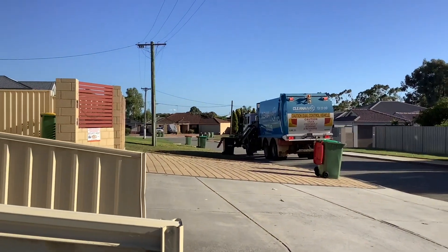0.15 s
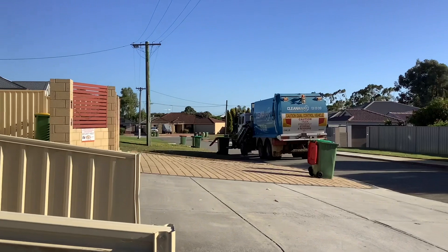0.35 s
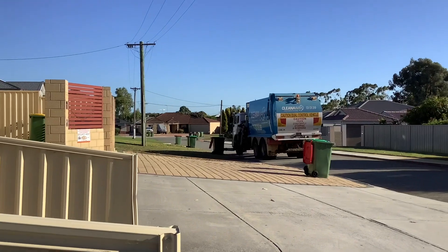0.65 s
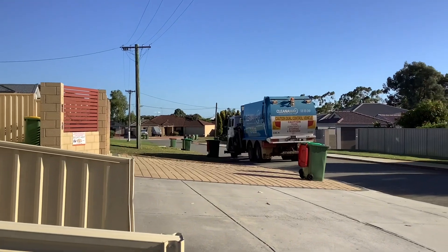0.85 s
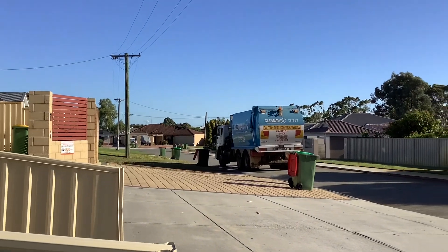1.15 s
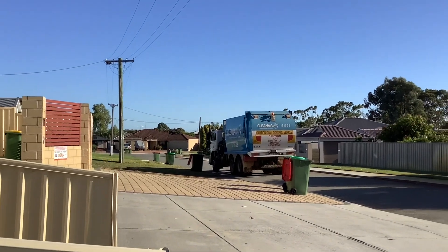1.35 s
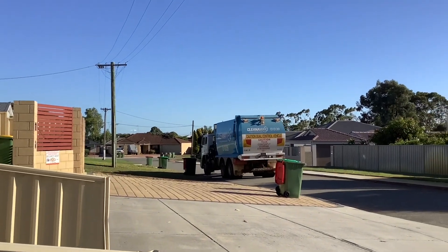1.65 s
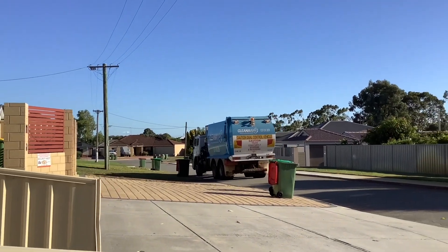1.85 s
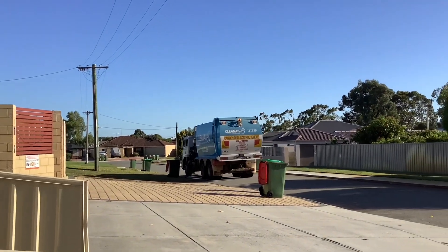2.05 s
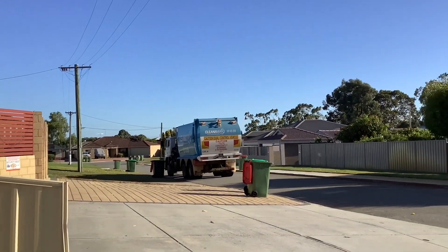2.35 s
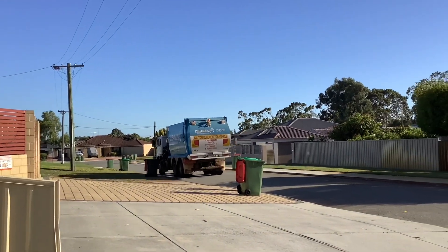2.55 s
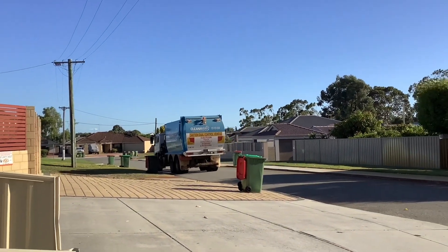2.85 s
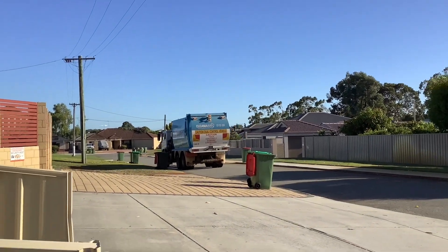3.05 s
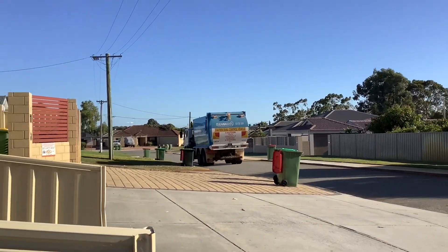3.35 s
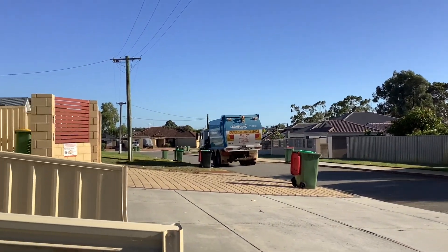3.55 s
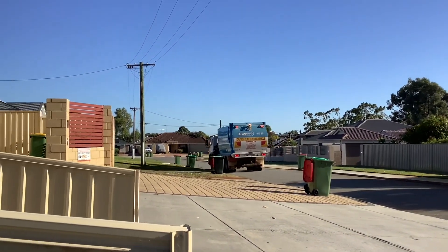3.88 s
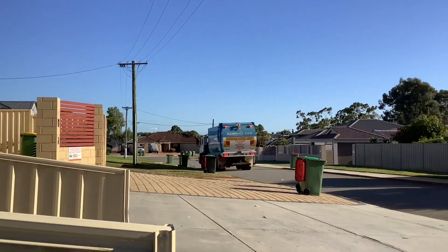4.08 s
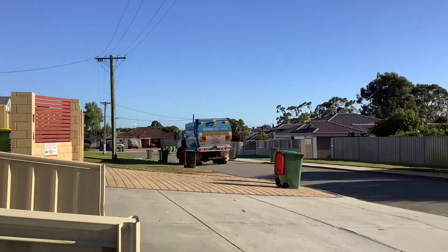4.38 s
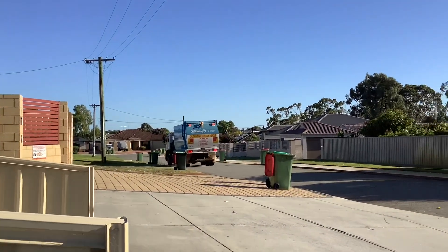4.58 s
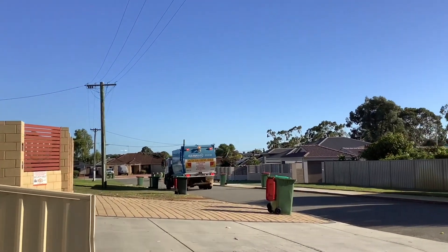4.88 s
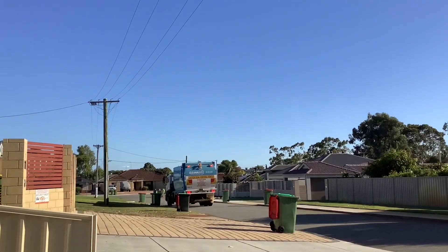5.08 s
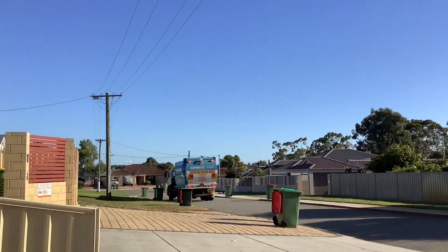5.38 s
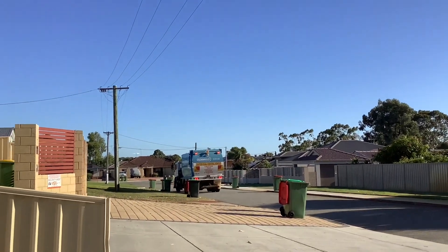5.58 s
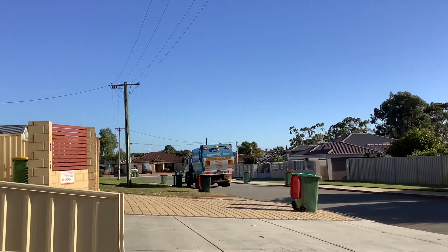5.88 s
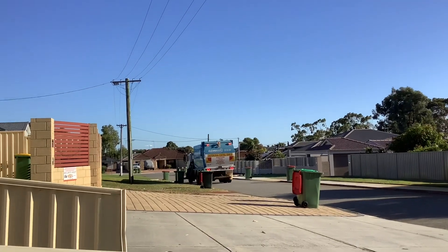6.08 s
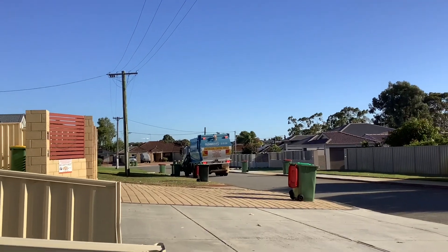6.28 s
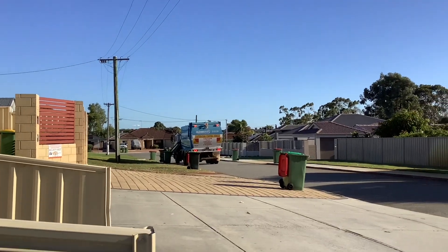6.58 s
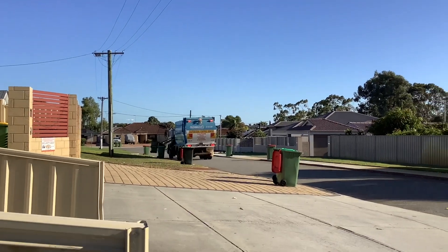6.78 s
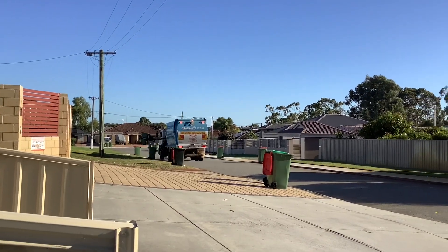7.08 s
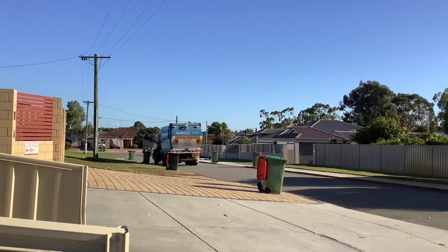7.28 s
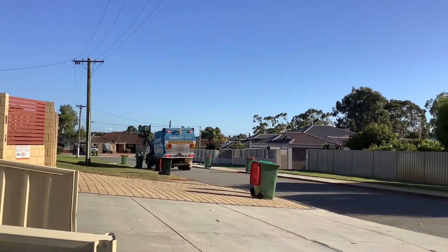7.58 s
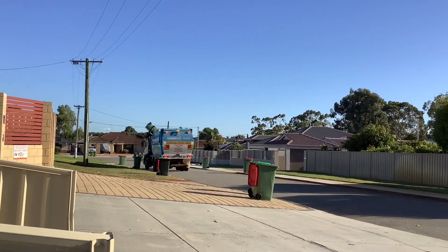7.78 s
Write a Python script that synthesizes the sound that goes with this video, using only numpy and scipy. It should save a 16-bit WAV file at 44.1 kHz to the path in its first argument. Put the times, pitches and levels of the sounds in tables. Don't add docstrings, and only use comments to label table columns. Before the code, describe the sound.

Outdoors on a suburban street, strong wind rumbles and flaps against a single microphone. Behind it a diesel truck pulls away, its drone, clatter, gear whine and turbo whistle climbing for three seconds. The throttle shuts, the pitches sink, then high ragged brake squeals ring as it stops farther off, with small air puffs and rattles.

```python
import sys
import numpy as np
from scipy import signal
from scipy.fft import rfft, irfft, next_fast_len
from scipy.io import wavfile
from scipy.ndimage import uniform_filter1d, minimum_filter1d, map_coordinates

SR = 44100
rng = np.random.default_rng(int(sys.argv[2]) if len(sys.argv) > 2 else 0)


def persist_wave(psi):
    counts = np.round(np.clip(psi, -1, 1) * 32767).astype(np.int16)
    wavfile.write(sys.argv[1], SR, np.atleast_2d(counts).T)


def magnitude_from_level(level_db):
    exponent = np.asarray(level_db, float) / 20
    return 10 ** exponent


N = 349817

# start_s, peak_db, pitch_hz
EDDIES = [(0.098, -13.5, 533), (0.148, -9.5, 483), (0.223, -14, 462), (0.319, -13, 434),
          (0.383, -14, 480), (0.462, -9.5, 315), (0.756, -7.5, 323), (0.796, -12, 393),
          (1.045, -12, 229), (1.181, -14, 199), (1.572, -12, 262), (1.643, -14.5, 258),
          (1.822, -12.5, 595), (2.123, -12, 264), (3.007, -18.5, 328), (3.296, -17, 254),
          (3.679, -12.5, 222), (3.829, -20, 241.6), (3.87, -13, 337), (3.995, -12, 350),
          (4.316, -11.5, 201), (4.353, -9, 430), (4.55, -6, 250), (4.627, -11, 450),
          (4.717, -11, 430), (4.768, -14, 503), (4.839, -14, 396), (5.066, -16.5, 290),
          (5.167, -10.5, 277), (5.399, -12, 324), (5.532, -10, 329), (5.545, -6, 512),
          (5.571, -15, 560), (5.61, -22, 523), (5.66, -10.5, 556), (5.7, -13, 597), (5.947, -9, 352),
          (5.986, -10.5, 590), (6.102, -10, 298), (6.219, -25, 470), (6.296, -9, 229),
          (6.39, -8.5, 570), (6.651, -12, 350), (6.738, -10.5, 247), (6.981, -12.5, 477),
          (7.097, -10.5, 450), (7.272, -11.5, 220), (7.299, -10, 471), (7.372, -15, 400),
          (7.412, -6.5, 300), (7.436, -4.5, 488), (7.468, -15, 436), (7.522, -11.5, 298),
          (7.574, -6, 445), (7.612, -7.5, 608), (7.652, -6.5, 290), (7.736, -13, 514),
          (7.836, -11, 301), (7.879, -12, 448)]
# start_s, peak_db, pitch_hz
MORE_EDDIES = [(0.399, -16, 374), (0.489, -13, 202), (4.573, -6.5, 273), (4.687, -10.5, 297),
               (4.737, -11, 563), (5.888, -9.5, 278), (6.049, -17, 288), (6.369, -8, 310),
               (7.334, -7.5, 237), (7.587, -10, 275), (7.764, -10, 223), (7.806, -12, 202),
               (7.904, -8, 347)]
# time_s, mesh_hz, load_db
DRIVE_TRAIN = [(0, 639, -43.5), (.62, 717, -46), (.72, 739, -44.5), (1.3, 948, -41), (1.9, 1118, -42.5),
               (2.35, 1221, -41), (3.1, 1447, -40.5), (3.25, 1141, -45.5), (3.6, 937, -48),
               (4.2, 625, -52.5), (5, 603, -53), (5.4, 601, -49.5), (6.3, 602, -52), (6.7, 597, -49.5),
               (7, 597, -51.5), (7.93, 602, -51)]


def unit(x):
    return x / np.sqrt(np.mean(x ** 2) + 1e-20)


def curves(rows):
    s, *cols = np.transpose(rows)
    return [np.interp(np.arange(N) / SR, s, c) for c in cols]


def along(points, hz):
    f, db = np.transpose(points)
    return np.interp(np.log(hz), np.log(f), db)


def wobble(rate_hz, size=N):
    knots = rng.standard_normal(int(size * rate_hz / SR) + 4)
    return map_coordinates(knots, [np.arange(size) * rate_hz / SR])


def coloured(x, points):
    m = next_fast_len(len(x) + 8192)
    f, db = np.transpose(points)
    gain = magnitude_from_level(np.interp(np.log(np.fft.rfftfreq(m, 1 / SR) + 1), np.log(f + 1), db))
    return unit(irfft(rfft(x, m) * gain, m)[:len(x)])


def patchy(patchy_db):
    z = signal.stft(rng.standard_normal(N + 512), nperseg=512)[2]
    field = uniform_filter1d(rng.standard_normal(z.shape), 6, 0)
    field = uniform_filter1d(field, 10, 1)
    return signal.istft(z * magnitude_from_level(patchy_db * unit(field)), nperseg=512)[1][:N]


def fuzzy_tone(hz, spread, shake_db, rate_hz):
    turns = np.cumsum(hz * (1 + spread * wobble(rate_hz, size=len(hz)))) / SR
    shake = magnitude_from_level(shake_db * wobble(rate_hz / 2, size=len(hz)))
    return unit(shake * np.sin(2 * np.pi * (turns + rng.random())))


def swell(peak_s, rise_s, fall_s, reach, edge=1.72):
    start = max(round((peak_s - reach * abs(rise_s)) * SR), 0)
    end = min(round((peak_s + reach * abs(fall_s)) * SR), N)
    t = np.arange(start, end) / SR - peak_s
    return start, t, magnitude_from_level(-13 * np.abs(t / np.where(t < 0, rise_s, fall_s)) ** edge)


def bursts(rate_hz, spread_db, life_s):
    kicks = (rng.random(N) < rate_hz / SR) * magnitude_from_level(spread_db * rng.standard_normal(N))
    t = np.arange(SR // 10) / SR
    return signal.fftconvolve(kicks, np.exp(-t / life_s) * (1 - np.exp(-t / 0.0022)))[:N]


def even(x, span_s):
    return x / np.sqrt(np.abs(uniform_filter1d(x ** 2, round(span_s * SR))) + 1e-3)


def gusts():
    # peak_s, flutter_db, half_length_s, flap_over_flutter_db
    gust_rows = [(0, -23, 0.048, -4), (0.142, -27, 0.093, -4), (0.38, -23.5, 0.28, -3.5),
                 (0.794, -23, 0.11, -7), (0.918, -25, 0.19, -4), (1.188, -27, 0.024, 1),
                 (1.376, -26.5, 0.098, -4.5), (1.806, -23.5, 0.27, -7.5), (2.13, -24.5, 0.028, -4),
                 (2.363, -29.5, 0.027, -5), (2.61, -29.5, 0.41, -7.5), (3.052, -30.5, 0.083, -18),
                 (3.304, -27, 0.03, -8), (3.6, -27, 0.23, -19), (3.85, -31, 0.18, -9.5),
                 (4.211, -23, 0.088, -12.5), (4.359, -18.5, 0.045, -6.5), (4.566, -19, 0.082, -11),
                 (4.731, -22.5, 0.19, -3), (5.172, -27.5, 0.049, -3), (5.422, -26.5, 0.081, -8),
                 (5.636, -26, 0.14, 1.5), (5.903, -22.5, 0.11, -4), (6.09, -26, 0.14, 0.5),
                 (6.384, -23.5, 0.21, -3), (6.674, -25, 0.097, -5), (6.997, -26, 0.48, -5.5),
                 (7.329, -18.5, 0.033, -10), (7.457, -22, 0.1, -0.5), (7.83, -20, 0.46, -3.5)]
    # peak_s, level_db, half_length_s
    heaves = [(1.8, 2, 0.18), (3.83, 2.5, 0.17), (5.7, 8.5, 0.094), (0.24, 4.5, 0.22), (2.36, 2, .08),
              (6.12, 3, 0.091), (7.35, 4, 0.087), (7.65, 2.5, 0.064), (3.7, 3, .1), (1.95, 2, .1),
              (5.45, -3, .1), (4.3, -3.5, 0.16), (7.2, -2.5, 0.065), (1.48, 1.5, .1), (5.2, 2, 0.079)]
    lull_db, lull_flap_db, rise_over_fall = -33, -9.5, 0.95
    rumble_mean_db, rumble_growth, rumble_lag_s = -29.5, 0.68, 0.13
    flutter = np.full(N, magnitude_from_level(2 * lull_db))
    flap = np.full(N, magnitude_from_level(2 * (lull_db + lull_flap_db)))
    for peak_s, db, half_s, flap_db in gust_rows:
        start, t, gain = swell(peak_s, rise_over_fall * half_s, half_s, reach=2)
        flutter[start:start + len(t)] += (magnitude_from_level(db) * gain) ** 2
        flap[start:start + len(t)] += (magnitude_from_level(db + flap_db) * gain) ** 2
    slow_db = 10 * np.log10(np.abs(uniform_filter1d(flutter, round(rumble_lag_s * SR))) + 1e-9)
    t = np.arange(N) / SR
    heave_db = sum(db * np.exp(-((t - s) / half_s) ** 2) for s, db, half_s in heaves)
    rumble_db = rumble_mean_db + rumble_growth * (slow_db - slow_db.mean()) + heave_db
    return np.sqrt(flutter), np.sqrt(flap), rumble_db


def stalls():
    hush_db, hush_s, wake_db, wake_s = -7, 0.0092, 2, .014
    marks, t = np.zeros(N), np.arange(-SR // 20, SR // 20 + 1) / SR
    marks[(np.array(EDDIES + MORE_EDDIES)[:, 0] * SR).astype(int)] = 1
    hush = hush_db * np.exp(-(t / hush_s) ** 2)
    wake = wake_db * np.exp(-np.abs(t) / wake_s)
    steps_db = signal.fftconvolve(marks, np.where(t < 0, hush, wake), "same")
    return magnitude_from_level(signal.fftconvolve(steps_db, np.hanning(201) / 100, "same"))


def wind():
    # freq_hz, density_db
    rumble_points = [(20, -50), (35, -25), (50, -4), (75, 3.5), (150, 5), (210, -6.5), (320, -43),
                     (600, -120)]
    # freq_hz, density_db
    flutter_points = [(90, -45), (150, -5.5), (200, 2), (380, -3.5), (500, -11.5), (700, -38), (1400, -120)]
    # freq_hz, density_db
    flap_points = [(250, -43), (370, -13.5), (460, 2), (650, -5), (850, -15.5), (1100, -28.5), (1600, -61),
                   (3000, -120)]
    flutter_gain, flap_gain, rumble_db = gusts()
    lumps = 0.38 + bursts(rate_hz=70, spread_db=2.2, life_s=0.0064)
    rumble = coloured(magnitude_from_level(1.3 * wobble(15)) * lumps ** 0.4 * rng.standard_normal(N), rumble_points)
    flutter = coloured(magnitude_from_level(2.1 * wobble(35)) * lumps ** 0.82 * rng.standard_normal(N), flutter_points)
    flap = coloured(magnitude_from_level(1.26 * wobble(60)) * lumps ** 0.87 * rng.standard_normal(N), flap_points)
    fast = flutter_gain * even(flutter, span_s=.08) + flap_gain * even(flap, span_s=.07)
    slow = magnitude_from_level(rumble_db) * even(rumble, span_s=0.16)
    return magnitude_from_level(1.4 * wobble(22)) * (slow + stalls() * fast)


def overrun():
    return np.clip((np.arange(N) / SR - 3.14) / .1, 0, 1)


def engine():
    # mesh_hz, level_db
    firing = [(600, -64), (660, -44), (800, -42), (950, -35), (1080, -36.5), (1230, -34), (1330, -41),
              (1450, -41)]
    # freq_hz, density_db
    casing = [(410, 3), (700, -2), (818, 2), (931, -4.5), (994, -1.5), (1290, -6), (1560, -7.5), (2000, -7),
              (2920, -11.5), (5880, -13), (6440, -16.5), (12200, -31), (15600, -46)]
    mesh_hz, load_db = curves(DRIVE_TRAIN)
    firings = np.cumsum(mesh_hz / 14) / SR
    drone = magnitude_from_level(along(firing, mesh_hz) + 0.5 + 0.83 * wobble(9.2)) * np.sin(2 * np.pi * firings)
    knock = 1 + 0.4 * np.exp(-4 * (firings % 1)) * magnitude_from_level(3.5 * wobble(60))
    clatter = coloured(knock * patchy(patchy_db=1.0), [(500, -37)] + casing)
    return drone + magnitude_from_level(load_db + 4.5 + 0.57 * wobble(9)) * clatter


def gears():
    # mesh_hz, level_db
    mesh = [(620, -70), (720, -48), (830, -44), (940, -44), (1040, -51), (1150, -55), (1290, -42),
            (1380, -47), (1450, -50)]
    # mesh_hz, level_db
    second = [(670, -80), (710, -57), (830, -49.5), (900, -53), (1050, -48.5), (1200, -51), (1290, -60),
              (1400, -55), (1450, -60)]
    # mesh_hz, level_db
    side_gear = [(620, -82), (800, -65), (940, -60), (1120, -60), (1200, -50.5), (1330, -50.5), (1450, -57)]
    # mesh_hz, level_db
    third = [(660, -80), (690, -55), (800, -55), (850, -80)]
    coast_db, second_coast_db = -4, -2.5
    mesh_hz, _ = curves(DRIVE_TRAIN)
    coasting = overrun()
    whine = fuzzy_tone(mesh_hz, spread=.013 + .005 * coasting, shake_db=3.2, rate_hz=120)
    whine *= magnitude_from_level(along(mesh, mesh_hz))
    upper = fuzzy_tone(2 * mesh_hz, spread=.01 + .01 * coasting, shake_db=2.8, rate_hz=150)
    upper *= magnitude_from_level(along(second, mesh_hz) + second_coast_db * coasting)
    side = fuzzy_tone(1.56 * mesh_hz, spread=.012, shake_db=2.8, rate_hz=120)
    upper += magnitude_from_level(along(side_gear, mesh_hz) + 2 * coast_db * coasting) * side
    top = fuzzy_tone(3 * mesh_hz, spread=.008, shake_db=3, rate_hz=150)
    upper += magnitude_from_level(along(third, mesh_hz)) * coasting * top
    whine *= magnitude_from_level(coasting * (2.5 * wobble(14) - 2))
    upper *= magnitude_from_level(2 * coasting * wobble(16))
    return magnitude_from_level(coast_db * coasting) * (whine + upper)


def turbo():
    # time_s, pitch_hz
    speed = [
        (0, 5890),
        (.65, 6000),
        (1.35, 8770),
        (1.8, 10630),
        (3.05, 15660),
        (3.17, 15200),
        (3.4, 13350),
        (3.62, 11750),
        (4.05, 9780),
        (4.4, 8400),
    ]
    # pitch_hz, level_db
    whistle_points = [(5880, -62), (5950, -56), (6100, -61), (7000, -61.5), (8500, -59.5), (9600, -56),
                      (12200, -63), (15600, -77)]
    spool_down_db, stop_s = -9, 4.05
    coasting = overrun()
    turbo_hz, = curves(speed)
    unloaded = coasting * np.clip((14000 - turbo_hz) / 3500, .3, 1)
    level_db = along(whistle_points, turbo_hz) + spool_down_db * unloaded
    level_db -= 90 * np.maximum(np.arange(N) / SR - stop_s, 0)
    spread = .003 + (.02 - .006 * coasting) * np.clip(turbo_hz / 2000 - 3, 0, 1)
    return magnitude_from_level(level_db + wobble(14)) * fuzzy_tone(turbo_hz, spread, shake_db=3, rate_hz=900)


def street():
    # freq_hz, density_db
    hiss = [(530, -37), (900, -1), (990, -19), (1120, -4.5), (1420, -5), (2050, -12.5), (3420, -14),
            (5990, -10.5), (6520, -13), (10500, -17), (15600, -36)]
    return magnitude_from_level(-55.0) * coloured(patchy(patchy_db=-2.0), [(600, -40)] + hiss)


def valves():
    # peak_s, level_db, fall_s, centre_hz, width_hz
    puff_rows = [(.134, -37, .022, 4100, 2200), (.132, -48, .02, 7500, 900), (.132, -56, .015, 11500, 1200),
                 (.1, -46, .05, 3500, 4000), (.55, -48, .012, 4200, 1500), (.55, -59, .008, 9300, 1500),
                 (.812, -53, .005, 9000, 4000), (.75, -49.5, 0.12, 5600, 8000),
                 (4.07, -72, .03, 13600, 300), (5.78, -54, .008, 9500, 6000), (1.33, -46, .1, 4700, 2300),
                 (1.3, -39, 0.11, 2700, 4400), (1.4, -37.5, 0.055, 4500, 900),
                 (5.55, -49, 0.049, 4330, 1500), (5.625, -45.5, 0.032, 4900, 1800),
                 (5.71, -46, 0.026, 3000, 4700), (5.82, -42.5, 0.076, 4200, 2200),
                 (5.88, -45, 0.064, 4450, 1500), (6.479, -35.5, .012, 1450, 600),
                 (6.51, -47, .015, 1350, 400), (6.535, -45, .012, 2000, 600), (7.3, -52, .02, 2850, 300),
                 (6.79, -52, .025, 2950, 300), (6.92, -54, 0.028, 2950, 300), (6.41, -54, 0.027, 3000, 300),
                 (6.48, -52, .05, 4500, 3000), (3.615, -61, .012, 10500, 5000),
                 (4.7, -58, .015, 13000, 3000), (6.475, -46, 0.05, 2140, 250),
                 (6.551, -48, .07, 4100, 3500), (6.595, -45, 0.045, 1800, 700),
                 (6.58, -54, 0.21, 2300, 2600), (7.77, -48, 0.042, 5000, 2500),
                 (7.84, -52, 0.062, 5150, 698), (3.03, -58, 0.17, 9100, 300)]
    out = np.zeros(N)
    for peak_s, db, fall_s, hz, width_hz in puff_rows:
        start, t, gain = swell(peak_s, .75 * fall_s, fall_s, reach=1.8)
        low_hz, high_hz = max(hz - width_hz / 2, 900), hz + width_hz / 2
        band = [(low_hz * 0.32, -22), (low_hz, -3), (hz, 0),
                (high_hz, -3), (high_hz * 1.5, -24), (high_hz * 3, -60)]
        grit = magnitude_from_level(2.2 * wobble(118.2, size=len(t))) * rng.standard_normal(len(t))
        out[start:start + len(t)] += magnitude_from_level(db) * gain * coloured(grit, band)
    return out


def eddies():
    out, t = np.zeros(N + SR), np.arange(SR // 20) / SR
    for s, db, hz in EDDIES + MORE_EDDIES:
        u = t * hz / 0.7
        push = u * u * np.exp(-1.5 * u) * np.sin(2 * np.pi * (hz * t + rng.random()))
        out[round(s * SR):][:len(t)] += magnitude_from_level(db + 9.3) * push
    return out[:N]


def brakes():
    # peak_s, pitch_hz, level_db, half_length_s, glide_hz_per_s
    bite = [(4.227, 8470, -56, 0.034, -230), (4.232, 8640, -47.5, 0.095, -11),
            (4.328, 8900, -57, 0.101, 430), (4.345, 8780, -50, 0.133, 290), (4.379, 7800, -54, 0.057, -900),
            (4.403, 6890, -59, 0.035, -1.5), (4.431, 8000, -53, 0.059, 200), (4.471, 9250, -52, 0.079, 378),
            (4.476, 7780, -49, 0.124, 298), (4.477, 8720, -43.5, 0.053, 430),
            (4.525, 7650, -47, 0.042, -260), (4.533, 7720, -43, 0.133, 60),
            (4.606, 8950, -43.5, 0.097, 622), (4.609, 7040, -45, 0.057, -590),
            (4.651, 7120, -42, 0.13, 234), (4.663, 9500, -56, 0.057, 510), (4.683, 8900, -53, 0.033, 480),
            (4.686, 7200, -54, 0.098, -450), (4.696, 4500, -50, 0.058, 450),
            (4.698, 10610, -61, 0.064, -860), (4.704, 9010, -46.5, 0.041, -900),
            (4.706, 8800, -52, 0.056, 220), (4.712, 9070, -52, 0.085, -780), (4.728, 8030, -41, 0.042, 340),
            (4.788, 10680, -58, 0.063, 410), (4.805, 7380, -50.5, 0.171, 785),
            (4.806, 7830, -47, 0.069, -220), (4.829, 9300, -60, 0.064, 290), (4.831, 9490, -63, 0.049, 900),
            (4.846, 8360, -45, 0.121, -100), (4.863, 8800, -54, 0.105, -320),
            (4.873, 10660, -53, 0.067, 880)]
    # peak_s, pitch_hz, level_db, half_length_s, glide_hz_per_s
    hold = [(4.969, 9530, -62, 0.059, 100), (4.977, 8540, -53, 0.115, -440),
            (4.978, 10750, -58, 0.057, -330), (4.982, 6350, -42.5, 0.12, 339),
            (5.015, 8180, -52, 0.15, 110), (5.043, 6590, -53.5, 0.139, -130),
            (5.088, 10600, -66, 0.059, -47), (5.097, 9040, -40, 0.086, 860),
            (5.148, 10010, -66, 0.099, 243), (5.166, 6420, -52.5, 0.18, -200),
            (5.224, 11380, -54, 0.125, 300), (5.25, 8300, -47, 0.151, -100),
            (5.268, 10840, -60, 0.043, 470), (5.282, 7730, -36, 0.107, 131), (5.29, 10970, -62, 0.139, 250),
            (5.299, 5380, -37, 0.091, -77), (5.308, 8930, -49, 0.12, 380), (5.314, 5670, -51, 0.04, 150),
            (5.315, 11330, -60, 0.043, 420), (5.364, 8310, -53, 0.063, -330),
            (5.371, 9940, -51, 0.145, -330), (5.394, 8870, -56, 0.061, -10), (5.396, 4290, -56, 0.05, -10),
            (5.407, 7730, -37, 0.099, -190), (5.409, 11450, -57, 0.071, 336),
            (5.437, 9630, -45, 0.12, -380), (5.209, 5390, -50, 0.046, 0), (5.43, 5380, -47, 0.06, -110),
            (5.522, 5360, -51.5, 0.045, 0), (5.48, 8740, -61, 0.11, -130), (5.488, 6400, -53, 0.058, -170),
            (5.49, 8630, -58, 0.038, -180), (5.515, 10000, -58, 0.073, 330), (5.52, 7800, -53, 0.113, -890),
            (5.564, 7930, -51, 0.057, 540), (5.636, 8770, -53, 0.071, 78), (5.64, 7800, -56, 0.057, 1),
            (5.663, 8580, -63, 0.047, 340), (5.707, 7710, -61, 0.092, 310)]
    # peak_s, pitch_hz, level_db, half_length_s, glide_hz_per_s
    dab = [(5.803, 7860, -55, 0.136, -440), (5.837, 7650, -60, 0.089, -150), (5.935, 8780, -62, 0.081, 140),
           (5.959, 9310, -65, 0.04, -70), (5.972, 7820, -60, 0.071, -760), (6.011, 9020, -54.5, 0.098, 900),
           (6.058, 9230, -61, 0.102, 570), (6.068, 8390, -48, 0.11, 650), (6.072, 7860, -61, 0.061, 220),
           (6.076, 10000, -59, 0.12, 0), (6.105, 8740, -58, 0.05, 720), (6.184, 8320, -62, 0.059, -230),
           (5.95, 10700, -65, .04, 300), (6.2, 12400, -66, .07, 0), (6.216, 5240, -61, 0.045, 160),
           (6.223, 8940, -56, 0.12, 170), (6.236, 8540, -46.5, 0.075, 188), (6.251, 10970, -54, 0.094, 170),
           (6.252, 7980, -48, 0.088, 30), (6.27, 9580, -59, 0.083, 740), (6.428, 8000, -64, 0.064, -280)]
    out = np.zeros(N)
    for peak_s, hz, db, half_s, glide in bite + hold + dab:
        start, t, gain = swell(peak_s, half_s, half_s, reach=1.7, edge=2.1)
        pitch_hz = hz + glide * t
        line = fuzzy_tone(pitch_hz, spread=.0013, shake_db=3.4, rate_hz=170)
        halo = fuzzy_tone(pitch_hz, spread=.009, shake_db=2.5, rate_hz=700)
        halo_db = -8 - .45 * (db + 48)
        out[start:start + len(t)] += magnitude_from_level(db + 3) * gain * (line + magnitude_from_level(halo_db) * halo)
        if 2 * hz > 16000:
            continue
        octave = fuzzy_tone(2 * pitch_hz, spread=.004, shake_db=6, rate_hz=150)
        octave_db = db - 18 - 11 * abs(hz / 1000 - 6.4)
        out[start:start + len(t)] += magnitude_from_level(octave_db) * gain * octave
    return out


def house_fronts(x):
    echo = rng.standard_normal(SR // 3) * magnitude_from_level(-60 * np.arange(SR // 3) / SR / 0.74)
    return signal.fftconvolve(x, echo / np.linalg.norm(echo))[:N]


def scene():
    squeal, puffs = brakes(), valves()
    echoes = house_fronts(magnitude_from_level(-10) * squeal + magnitude_from_level(-6.0) * puffs)
    truck = engine() + gears() + turbo() + puffs + squeal
    return (truck + echoes + street() + wind() + eddies())[None]


def band_limit(x):
    return signal.sosfilt(signal.butter(12, 15710, fs=SR, output="sos"), x)


def record(dry):
    # freq_hz, gain_db
    port = [(5800, -3), (5990, -2.5), (6120, -5), (6200, -5.5), (9000, -2), (12000, -3.5), (14000, -1),
            (15700, 1)]
    fade = np.minimum(1, .2 + np.arange(N)[::-1] / 200)
    x = np.std(dry) * coloured(dry[0], port) * fade
    needed = minimum_filter1d(np.minimum(1, .56 / (np.abs(x) + 1e-9)), size=601)
    return band_limit(x * uniform_filter1d(needed, size=601))


dry = scene()
out = record(dry)
persist_wave(out)
```